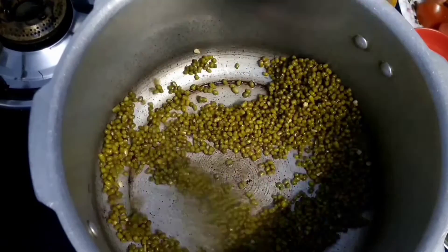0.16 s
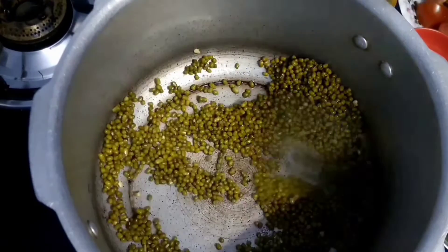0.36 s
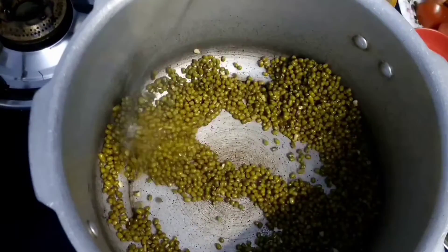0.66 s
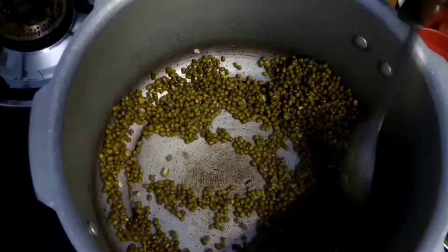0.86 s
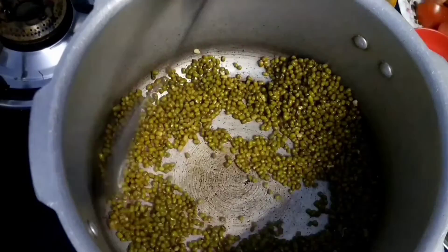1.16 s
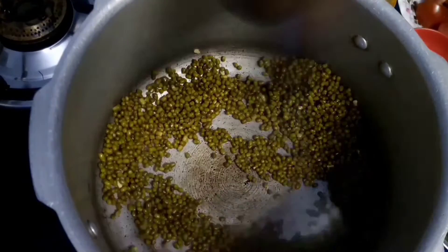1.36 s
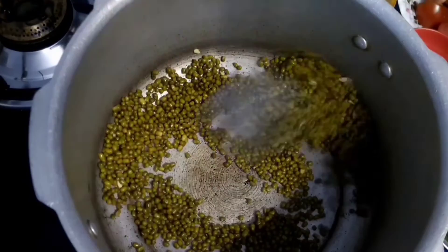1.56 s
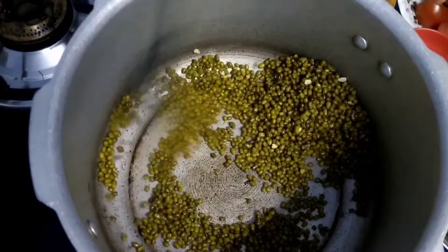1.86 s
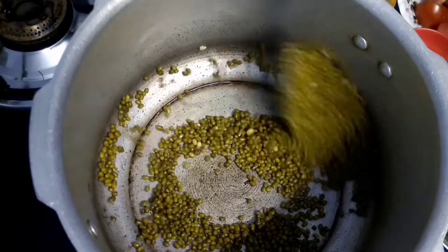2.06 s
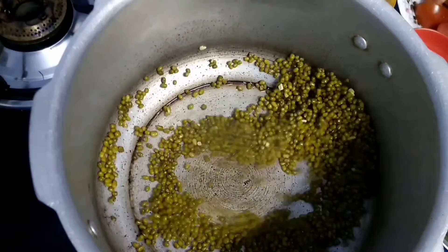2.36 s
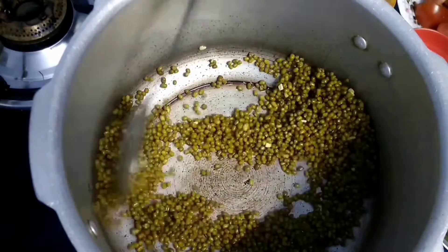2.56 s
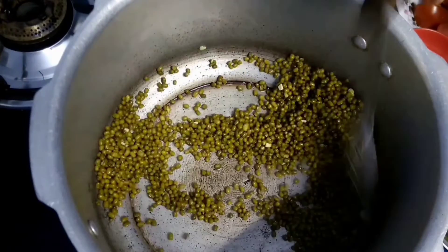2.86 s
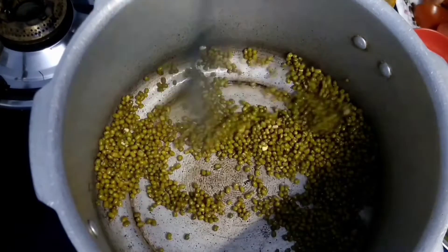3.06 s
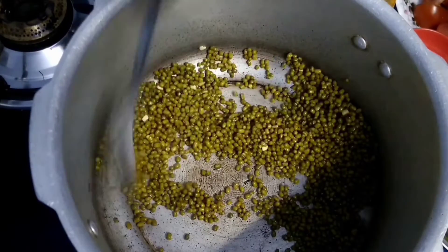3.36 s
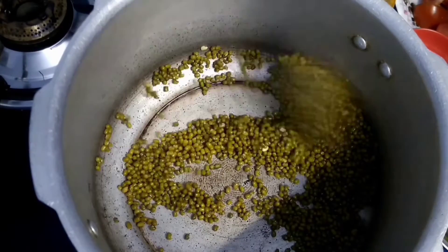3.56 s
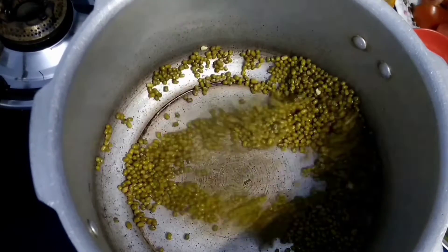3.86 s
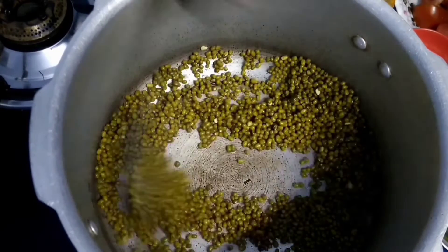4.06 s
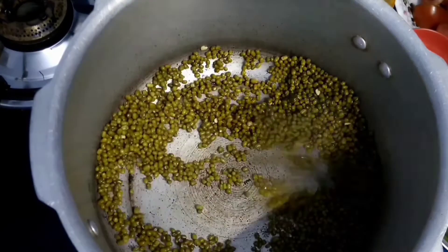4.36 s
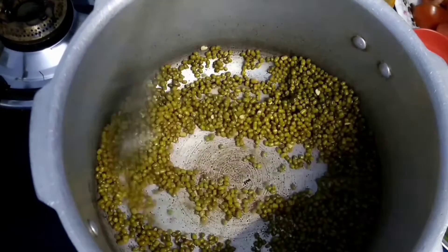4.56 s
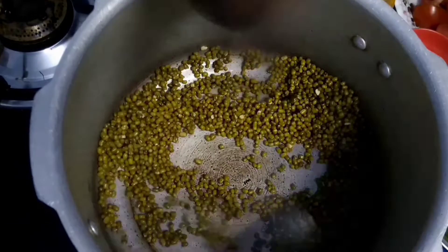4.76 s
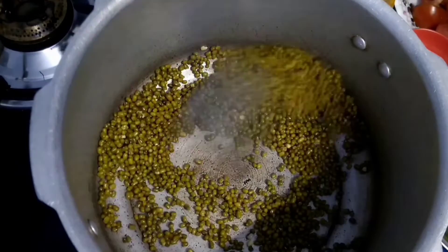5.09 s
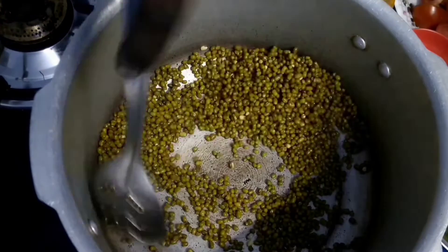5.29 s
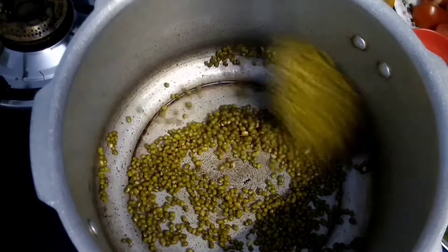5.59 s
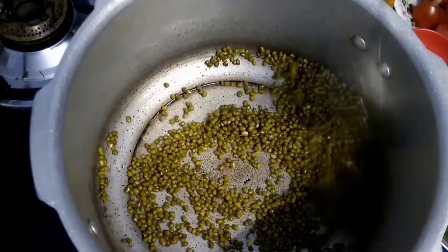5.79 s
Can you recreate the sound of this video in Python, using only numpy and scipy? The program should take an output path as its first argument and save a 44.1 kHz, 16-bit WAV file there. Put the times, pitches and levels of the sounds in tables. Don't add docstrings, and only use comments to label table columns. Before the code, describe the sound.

Thousands of small hard beans roll and tick over bare metal in uneven waves, several per second, pushed by a steel blade. Dull short thuds and rough drags on the pot base lead each wave, with thin squeals from jammed beans. Now and then the pot wall rings, then is damped. The last second is loudest. Close mono microphone, dry quiet kitchen, soft hiss beneath.

```python
import sys
import numpy as np
from scipy import signal
from scipy.fft import rfft, irfft
from scipy.io import wavfile
from scipy.ndimage import uniform_filter1d

SR = 44100
rng = np.random.default_rng(int(sys.argv[2]) if len(sys.argv) > 2 else 0)


def invert_db(x):
    u = np.asarray(x, float) / 20
    return 10 ** u


def wav_record(signal):
    frames = np.transpose(np.atleast_2d(signal))
    bounded = np.clip(frames, -1, 1)
    quanta = np.round(bounded * 32767).astype(np.int16)
    wavfile.write(sys.argv[1], SR, quanta)


N = 261513

# fullest_s, patter_db, build_s, settle_s
HEAPS = [(.04, -17, 0.2, 0.19), (0.231, -19, 0.074, 0.056), (.38, -19, 0.22, 0.15), (.62, -21, 0.091, 0.26),
         (.9, -22, 0.13, 0.22), (1.209, -23, 0.072, 0.27), (1.312, -18, 0.1, 0.34), (1.675, -24.5, .006, 1),
         (1.852, -19.5, 0.11, 0.19), (1.95, -34, 0.082, 0.45), (2.2, -24.5, 0.097, 0.55),
         (2.36, -21.5, 0.23, 0.076), (2.61, -18.5, 0.076, 0.29), (2.73, -22.5, 0.081, 0.51),
         (2.98, -27, 0.14, 0.25), (3.185, -11.5, 0.005, 0.049), (3.339, -20.5, 0.16, 0.2),
         (3.555, -33, 0.045, 0.15), (3.82, -21, 0.57, 0.2), (4.052, -18, 0.064, 0.17),
         (4.19, -20.5, 0.032, 0.22), (4.4, -23, 0.18, 0.16), (4.6, -25, 0.14, 1), (4.822, -17, 0.088, 0.25),
         (5.081, -28.5, 0.08, 0.035), (5.2, -9.5, 0.0066, 0.019), (5.331, -14, 0.083, 0.22),
         (5.64, -26.5, 0.22, 0.065), (5.713, -1.5, 0.0073, 0.03), (5.9, -21, 0.37, 0.15)]
HEAP_RANGE_DB, BUILD_CURVE, SETTLE_CURVE = 21.5, 2.4, 1.53
# start_s, peak_db, blade_ring_db
BEAN_DROPS = [(0.024, -1, -25), (0.196, -7, 11), (0.527, -19, 7.5), (0.775, -14, 1), (0.9867, -6.5, 3.5),
              (1.1373, -18.5, -5), (1.265, -20, -1.5), (1.424, -4.5, -20.5), (1.6682, 6.5, -16),
              (1.7372, -3, -14), (1.848, -11.5, -35.5), (1.9085, -11, 8.5), (2.162, -4.5, -6),
              (2.374, -8, -6), (2.4375, -9.5, 9), (2.5316, 2, -20), (2.6454, -3, 2), (2.7036, -0.5, -13),
              (3.1482, -19, -19), (3.1786, 11, -3), (3.333, -5, 0.1), (3.5254, -7, -1), (3.598, -2.5, -20),
              (3.9103, -15, 0.5), (3.9846, 0, -6), (4.538, -10, -7), (4.685, -14, 14), (4.753, -1.5, -20),
              (5.286, -18, 5), (5.7132, -23.5, 8), (0.307, -10, -12), (0.383, -2.5, -10), (0.447, -10, -5),
              (0.5796, -20, -10), (0.834, -10, -12), (1.2057, -30, -8), (1.241, -21, -10),
              (2.1329, -28, -22), (2.237, -12, -10), (2.394, -3, -10), (2.518, -4.5, -18), (2.591, -8, -10),
              (2.7234, -1, -13), (3.304, -11, -12), (3.555, -7, -12), (3.722, -4, -8), (3.778, -5, -10),
              (3.8172, -10, -12), (3.849, -4.5, -10), (3.929, -9.5, -1.5), (4.0253, -5, 0),
              (4.048, -6.5, 9), (4.188, -6.5, -1), (4.335, -19, -10), (4.3535, -9.5, -4),
              (4.3795, -7.5, -2), (4.605, -9, -3), (4.667, -10, -11), (4.787, -5, -12), (5.3263, -9, -10)]
# pitch_hz, level_db, fade_60db_s
BLADE_MODES = [(6775, -3, .1), (7600, -3, .12), (7790, -5, .08), (8330, -5, .08), (9150, -5, .07),
               (9850, -2, .11), (10600, -5, .08), (11400, -2, .08), (11700, -5, .07), (12410, -2, .09),
               (13610, -2, .09), (14050, -5, .07)]
# pitch_hz, level_db (per Hz)
PATTER_TONE = [(1400, -91), (2500, -18), (4000, -22.5), (5300, -19.5), (6300, -9.5), (7300, -8),
               (10000, -9), (13900, -7), (15600, -14), (16400, -42)]

# start_s, peak_db, blade_edge_db
KNOCKS = [(0.026, 0.5, -27), (0.279, -7, -38), (0.302, -7.5, -23), (0.604, -10, -33), (0.85, -9.5, -20),
          (1.248, -14.5, -45), (1.281, 3, -25), (1.377, -2, -17), (1.669, 0, -14), (1.738, -3.5, -13),
          (2.197, -4, -9), (2.316, -22, -22), (2.487, -23, -46), (2.531, -2, -21), (2.746, -39, -7.5),
          (2.796, -41, -8), (3.212, -5, -45.5), (3.354, 0.5, -24), (3.637, -10, -49), (3.684, -13, -43),
          (3.985, -1.5, -13.5), (4.254, -13, -52), (4.606, -22, -30), (4.712, -5, -26), (4.747, -7, -21),
          (4.849, -1, -15), (5.205, 1, -6.5), (5.255, -18, -35), (3.936, -26, -50), (5.708, -22, -3),
          (0.329, -16, -13.5), (0.566, -32, -55), (0.858, -9.5, -18), (0.891, -10.5, -30),
          (1.169, -39, -55), (1.286, -7, -25), (1.299, -5, -32), (1.32, -11, -29), (1.341, -6, -18),
          (2.185, -15, -29), (2.504, -16.5, -49), (2.575, -10, -33), (2.723, -44, -27), (2.772, -29, -35),
          (2.81, -16, -28), (2.878, -27, -34), (3.754, -21.5, -27), (3.785, -23.5, -30), (4.046, -16, -21),
          (4.309, -9.5, -33), (4.349, -17.5, -27), (4.541, -44, -53), (4.638, -23, -26),
          (4.829, -13.5, -25), (5.199, -17, -21), (5.302, -18, -32), (5.374, -23, -28), (5.425, -19, -45),
          (4.759, -4, -16), (4.805, -18, -29)]
# lands_s, stays_down_s, drag_db, grit_db, wall_brush_db
STROKES = [(0.01, 0.065, -27, -21, -39.5), (0.275, 0.1, -31.5, -24.5, -45.5),
           (0.599, 0.055, -39, -22.5, -80), (0.845, 0.077, -26.5, -19.5, -55),
           (1.278, 0.065, -14, -35, -36.5), (1.38, 0.062, -28, -32, -39), (1.67, 0.11, -21.5, -29, -42),
           (1.81, 0.16, -27, -26, -36), (2.186, 0.055, -26, -25, -36.5), (2.28, 0.042, -35, -24, -50),
           (2.52, 0.094, -29, -23.5, -54), (2.751, 0.051, -49, -14.5, -55), (2.801, 0.12, -30, -31, -40.5),
           (3.184, 0.14, -28, -32, -40), (3.331, 0.087, -25.5, -25, -48), (3.625, 0.15, -34.5, -25, -52),
           (3.981, 0.086, -28.5, -21, -43), (4.255, 0.1, -32.5, -26, -54),
           (4.603, 0.075, -34.5, -44, -42.5), (4.745, 0.12, -15, -33, -48), (4.88, 0.082, -40, -53, -41),
           (5.201, 0.16, -25.5, -31.5, -38.5), (5.373, 0.086, -26.5, -37, -30),
           (5.714, 0.17, -25, -26.5, -28.5)]
DRAG_SLOPES, GRIT_SLOPES, BRUSH_SLOPES = (1994, 27.5, 359), (707, -83.5, 185), (578, 31, 108)
# pitch_hz, level_db, fade_60db_s
BASE_MODES = [(315.8, -12.5, 0.15), (509.5, -1, 0.052), (512.8, -3.5, 0.14), (569.6, -12, 0.087),
              (625, -13, 0.023), (702.5, -8, 0.16), (849, -16.5, 0.13), (1018, -13.5, 0.28),
              (1060, -38, 0.045), (1132, -4.5, 0.054), (1196, -3.5, 0.04), (1180, -3, 0.026),
              (1757, -16.5, 0.2), (2020, -33, 0.26), (2340, -22, 0.26), (2924, -32, 0.26),
              (3560, -38, 0.24)]
# pitch_hz, level_db (per Hz)
DRAG_TONE = [(15, -72), (25, -41), (201, -15.5), (282, -18), (525, -2.5), (902, -7.5), (1060, -6.5),
             (1780, -8.5), (2560, -40), (3000, -47), (3900, -50), (6600, -120)]
# pitch_hz, level_db (per Hz)
GRIT_TONE = [(120, -61), (710, -20), (1200, 0.5), (1590, -4.5), (1680, -2), (2080, 2.5), (2660, -3),
             (3180, -3.5), (3780, -5), (5500, -9.5), (7150, -63), (12100, -120)]
# loudest_s, length_s, pitch_hz, level_db
JAMS = [(.31, 0.061, 903, -32), (0.337, 0.028, 1184, -30), (.64, 0.078, 1280, -39.5),
        (0.668, 0.18, 2060, -47), (0.714, 0.053, 2090, -39.5), (0.869, .03, 1160, -35),
        (0.919, 0.11, 1200, -38), (.93, .1, 2400, -45), (1.752, .06, 1150, -42), (2.276, 0.054, 1990, -39),
        (2.6, 0.096, 2390, -37.5), (2.758, .04, 2000, -43), (2.755, 0.026, 1170, -34),
        (2.818, 0.027, 980, -31), (3.305, 0.099, 1110, -36), (3.728, 0.058, 2814, -29.5),
        (3.751, 0.073, 1340, -36), (3.779, .05, 2040, -33.5), (4.053, 0.056, 2130, -29.5),
        (4.35, .08, 2040, -40), (4.422, 0.15, 2120, -43.5), (4.559, 0.05, 1150, -47),
        (4.629, 0.076, 1210, -38), (4.641, .05, 2330, -44), (4.766, 0.026, 1770, -33),
        (4.894, 0.12, 4600, -40), (5.29, .06, 2300, -41), (5.372, .12, 5000, -31),
        (5.391, 0.13, 4270, -34.5), (5.77, 0.072, 4300, -24), (5.845, 0.049, 2490, -29),
        (0.335, .06, 4200, -39), (1.288, 0.049, 2350, -42), (2.539, 0.034, 5200, -31),
        (3.701, 0.15, 4600, -40), (1.3, .07, 1760, -28.5), (1.31, .08, 1110, -29),
        (1.397, .06, 2070, -30.5), (5.43, 0.063, 564, -33), (5.44, 0.087, 1125, -33),
        (3.41, 0.073, 518, -30.5), (1.79, 0.077, 521, -31), (2.57, 0.077, 520, -31.5),
        (4.001, 0.042, 805, -34.5), (4.28, 0.054, 525, -33.5), (5.718, 0.029, 6550, -26),
        (3.193, 0.02, 5760, -18.5), (1.86, .05, 6660, -29), (5.798, .05, 955, -32), (4.8, 0.094, 1096, -28)]

# start_s, level_db, lowest_mode_db, second_mode_db, treble_db
CLANKS = [(0.203, -51.5, -20, -14, 5), (1.281, -52, 28, 23, -24), (1.343, -43, 4, -3, -5),
          (1.838, -33, -18.5, 13, -8.5), (1.897, -32, -27, -8, -15), (1.929, -35.5, -10, 12.5, -5.5),
          (2.744, -37, -25, -23, -7), (2.795, -31.5, 3, -1, -19.5), (3.182, -27.5, -24, -0.5, -0.5),
          (3.533, -53.5, -22, -22, 11.5), (4.2, -54, -24, 1, 0), (4.852, -46.5, 18, 21.5, -10),
          (5.209, -30, -14, -9, -28), (5.389, -43, 5, -14, -1.5), (5.43, -33.5, 10.5, -22, -10.5),
          (5.711, -23, 1, -11, -1), (5.788, -33.5, 11.5, 4, -10), (5.835, -45, 18, 1, -2)]
WALL_HZ = [769, 1028, 1575, 1598, 2137, 2153, 2520, 2546, 2929, 3452, 4078, 4301, 4549, 4780, 4832, 5071,
           5560, 5690, 6030, 6140, 6589, 6770, 6880, 7260, 7598, 7850, 8470, 8726, 324]
# level_db, fade_60db_s
WALL_MODES = [(-3.5, 0.73), (0, 0.84), (-0.5, 0.69), (-1.5, 0.69), (5, 0.5), (0, 0.57), (-5, 0.38),
              (0.5, 0.76), (6, 0.51), (2, 0.4), (-5.5, 0.33), (9, 0.3), (6.5, 0.1), (2, 0.28), (4, 0.24),
              (7, 0.1), (4, 0.19), (9, 0.085), (14, 0.17), (8, 0.14), (12, 0.19), (-12, 0.2), (-15, 0.12),
              (-11, 0.14), (12, 0.18), (9, 0.27), (-8, 0.13), (-10, 0.1), (-17, 0.51)]
PAIR_LEAN_DB = [9, 0.1, -7, 0, 6, -10, -6, 17, 15, 5, 8, -7, 12, 27, 20, -5, -3, 3]
PAIR_2150_DB = [0.46, 0.1, 0.1, 1.7, 2, 1.5, 0.1, 0.57, -1.2, 2, 0.1, 0.1, 0.39, -1.6, -2, 1.8, 0.1, 0.1]
TRIO_2500_DB = [1, 0.1, 0.1, -0.5, -1, -0.5, 0.1, 2, 0.8, -1, 0.1, -2, -4, -3, 0, -1.5, 1, 0.1]
LONE_3450_DB = [1, 0.1, -1, -3, 3, 6.5, -4, 0.1, -2.5, -10, -2, 0.1, 1, -1, -3, -4, 1, 2]
# pitch_hz, share (no unit)
HARDNESS = [(1100, -0.048), (1600, -0.16), (2140, 0.26), (3450, 0.85), (4300, 0.7)]
GRIPS_S = [.28, 1.44, 2.2, 2.755, 2.816, 3.42, 3.66, 4.28, 4.93, 5.66, 5.785, 5.95]

# pitch_hz, level_db
ECHO_NULLS = [(1600, -0.5), (1850, -3.5), (2050, -0.5), (3500, 0.5), (3780, -4), (4050, -0.5)]
# pitch_hz, level_db (per Hz)
KITCHEN_TONE = [(20, -27), (60, -1.5), (130, -14), (190, 9), (260, -1), (500, 3.5), (1000, -6), (2200, -20),
                (5000, -25)]


def beans(patter_db):
    s, db, blade_db = np.transpose(BEAN_DROPS)
    taps = grains(2400, 2.13, count=6) * invert_db(patter_db - 1.5 + 1.9 * walk(25) + 0.42 * walk(90))
    taps = taps * invert_db([2.9 * walk(13) + 1.88 * walk(45) for _ in taps])
    taps = taps + bursts(s, db + 18, 0.003, count=6)
    hz = 3700 + 12300 * (np.arange(330) + rng.random(330)) / 330
    t60 = 0.031 * invert_db(rng.standard_normal(330))
    ring = struck(taps, hz, 0 * hz, t60, 6.98, count=4096)
    stray = grains(160, 1.8, count=7) * invert_db(patter_db + 3.5)
    stray = stray + bursts(s, db + blade_db + 31, 0.0013, count=7)
    blade = struck(stray, *np.transpose(BLADE_MODES), 4, count=4096) * invert_db(-49)
    rattle = ring * invert_db(-52) + smear(taps.sum(axis=0), 0.003) * invert_db(-13)
    return colour(rattle + blade, PATTER_TONE) * invert_db(3.5)


def spatula(drag_db, grit_db):
    s, db, edge_db = np.transpose(KNOCKS)
    hz, mode_db, t60 = np.transpose(BASE_MODES)
    slips = grains(500, 2.4, count=4) * invert_db(drag_db - 36 + 1.03 * walk(30))
    knocks = np.abs(bursts(s, db - 19, 0.00008, count=6))
    body = struck(np.r_[slips, knocks * invert_db(-8)], hz, mode_db, t60, 1, count=8192)
    body = body + struck(knocks, hz, mode_db, 0.35 * t60, 1.5, count=4096)
    body = signal.sosfilt(signal.butter(3, 380, "high", fs=SR, output="sos"), body)
    shake = unit(colour(rng.standard_normal(N), DRAG_TONE)) * invert_db(drag_db - 8 + 2 * walk(8.2))
    edge = colour(bursts(s, edge_db + 20, 0.002, count=1)[0], GRIT_TONE)
    return body + shake + grinding(grit_db) + edge


def grinding(grit_db):
    rolls = grains(1800, 2.8, count=4) * invert_db([5.1 * walk(14) for _ in range(4)])
    patch_hz = 900 + 5000 * (np.arange(48) + rng.random(48)) / 48
    ring = struck(rolls, patch_hz, 0 * patch_hz, np.full(48, 0.053), 4, count=2048)
    rasp = unit(smear(rolls.sum(axis=0), 0.0038)) + invert_db(1) * unit(ring)
    return even(colour(rasp, GRIT_TONE), 0.15) * invert_db(grit_db - 18 + 2 * walk(35))


def jams():
    slips_per_s, fade_cycles, spread = 700, 90, 0.023
    out, t = np.zeros(N + 16384), np.arange(-4096, 4096) / SR
    for s, span, hz, db in JAMS:
        slips = (rng.random(8192) < slips_per_s / SR) * invert_db(4.6 * rng.standard_normal(8192))
        patch_hz = hz * (1 + spread * np.array([-1, 0, 1]) + 0.012 * rng.standard_normal(3))
        ring = rings(patch_hz, fade_cycles / patch_hz, count=2048).sum(axis=0)
        sing = even(signal.oaconvolve(slips, ring)[:8192], 0.013)
        start = int(s * SR)
        out[start:start + 8192] += invert_db(db) * sing * np.exp(-2 * (2 * t / span) ** 2)
    return out[4096:4096 + N]


def wall(brush_db):
    hz, (db, t60) = np.array(WALL_HZ), np.transpose(WALL_MODES)
    brush_taps = grains(300, 2.5, count=3) * invert_db(brush_db - 33)
    brush = struck(brush_taps, hz, db - 8 * np.log2(hz / 1000), 0.3 * t60, 2.5, count=8192)
    out = wall_blows(hz, db, t60) + brush + wall_clang()
    return signal.sosfilt(signal.butter(2, 420, "high", fs=SR, output="sos"), out)


def wall_blows(hz, db, t60):
    out, t = np.zeros(N + 20480), np.arange(20480) / SR
    phase = 2 * np.pi * rng.random((len(hz), 1))
    flutter = invert_db([3.5 * min(f / 4800, 1) ** 2 * np.resize(walk(70), len(out)) for f in hz])
    fade = np.exp(-np.log(1000) * np.outer(1 / t60, t))
    hard_share = np.interp(hz, *np.transpose(HARDNESS))
    blows = zip(CLANKS, PAIR_LEAN_DB, PAIR_2150_DB, TRIO_2500_DB, LONE_3450_DB)
    for (s, blow_db, first_db, second_db, treble_db), lean_db, pair_db, trio_db, lone_db in blows:
        start = int(s * SR)
        free_s = min([grip_s - s for grip_s in GRIPS_S if grip_s > s] + [1])
        favour_db = np.r_[first_db, second_db, -lean_db, 0.25 * lean_db, pair_db, pair_db,
                          trio_db, trio_db, trio_db, lone_db, 0 * hz[10:]]
        spot_db = db + treble_db * hard_share + favour_db
        gain = invert_db(blow_db + spot_db + 0.35 * rng.standard_normal(len(hz)))
        grip = np.outer(np.minimum(hz / 1700, 1.3) ** 1.3, np.maximum(t - free_s, 0) / 0.04)
        swing = np.sin(2 * np.pi * np.outer(hz, t + start / SR) + phase) * fade * np.exp(-grip)
        onset = 1 - np.exp(-t / 0.0005)
        out[start:start + len(t)] += gain @ (swing * flutter[:, start:start + len(t)]) * onset
    return out[:N]


def wall_clang():
    s, blow_db, _, _, treble_db = np.transpose(CLANKS)
    hz = 4100 + 5200 * (np.arange(200) + rng.random(200)) / 200
    t60 = 0.25 * invert_db(1.75 * rng.standard_normal(200))
    hits = bursts(s, blow_db + treble_db - 7.5, 0.0075, count=3)
    return struck(hits, hz, -3 * np.log2(hz / 5000), t60, 3.4, count=8192)


def kitchen():
    return unit(colour(rng.standard_normal(N), KITCHEN_TONE)) * invert_db(-63.5 + walk(17))


def heap_db():
    fullest, db, build, settle = np.transpose(HEAPS)[:, :, None]
    since = np.arange(0, N, 64) / SR - fullest
    building = (np.maximum(-since, 0) / build) ** BUILD_CURVE
    settling = (np.maximum(since, 0) / settle) ** SETTLE_CURVE
    return np.repeat(pile(db - HEAP_RANGE_DB * (building + settling)), 64)[:N]


def stroke_db(level_db, slopes):
    lands, down = np.transpose(STROKES)[:2, :, None]
    since = np.arange(0, N, 64) / SR - lands
    fall = slopes[0] * np.maximum(-since, 0)
    fall = fall + slopes[1] * np.clip(since, 0, down)
    fall = fall + slopes[2] * np.maximum(since - down, 0)
    return np.repeat(pile(level_db[:, None] - fall), 64)[:N]


def pile(db):
    return 10 * np.log10(np.sum(invert_db(np.maximum(db, -120)) ** 2, axis=0))


def grains(rate, scatter_db, count):
    falls = rng.random((count, N)) < rate / count / SR
    hardness = np.minimum(rng.exponential(size=(count, N)), 3.2)
    return unit(falls * invert_db(scatter_db * hardness))


def bursts(times, db, length_s, count):
    out, t = np.zeros((count, N + 4096)), np.arange(4096) / SR
    for k, (s, gain, span) in enumerate(np.broadcast(times, invert_db(db), length_s)):
        bounce = rng.standard_normal(4096) * np.exp(-t / max(span, 1e-4))
        start = int(s * SR)
        out[k % count, start:start + 4096] += gain * bounce / np.linalg.norm(bounce)
    return out[:, :N]


def struck(taps, hz, db, t60, spread_db, count):
    spots = rng.standard_normal((2, len(taps), len(hz)))
    gains = invert_db(db + spread_db * spots[0]) * np.sign(spots[1])
    shapes = gains @ rings(hz, t60, count)
    return sum(signal.oaconvolve(row, shape)[:N] for row, shape in zip(taps, shapes))


def rings(hz, t60, count):
    t = np.arange(count) / SR
    return np.sin(2 * np.pi * np.outer(hz, t)) * np.exp(-np.log(1000) * np.outer(1 / t60, t))


def smear(x, length_s):
    tail = rng.standard_normal(2048) * np.exp(-np.arange(2048) / SR / length_s)
    return signal.oaconvolve(x, tail / np.linalg.norm(tail))[:N]


def colour(x, points):
    hz, db = np.transpose(points)
    grid = np.maximum(np.arange(2049) * SR / 4096, 1)
    cepstrum = irfft(np.interp(np.log(grid), np.log(hz), db) * np.log(10) / 20)
    cepstrum[1:2048] *= 2
    cepstrum[2049:] = 0
    return signal.oaconvolve(x, irfft(np.exp(rfft(cepstrum))))[:N]


def walk(rate):
    k = int(SR / rate)
    return uniform_filter1d(np.repeat(rng.standard_normal(N // k + 1), k), k)[:N]


def even(x, span_s):
    power = uniform_filter1d(x ** 2, int(span_s * SR))
    return unit(x / (power + 0.01 * np.mean(x ** 2)) ** 0.4)


def unit(x):
    return x / np.sqrt(np.mean(x ** 2))


def scene():
    drag, grit, brush = np.transpose(STROKES)[2:]
    patter_db = heap_db()
    drag_db = pile([stroke_db(drag, DRAG_SLOPES), patter_db - 35])
    rolling_grit_db = patter_db - 12 + 0.31 * (patter_db + 28)
    grit_db = pile([stroke_db(grit, GRIT_SLOPES), rolling_grit_db])
    pot = beans(patter_db) + spatula(drag_db, grit_db) + wall(stroke_db(brush, BRUSH_SLOPES))
    mono = colour(pot + kitchen(), ECHO_NULLS) + jams()
    return np.array([mono, mono])


def top_cut(x):
    return signal.sosfilt(signal.butter(12, 16500, fs=SR, output="sos"), x)


def record(dry):
    x = signal.sosfilt(signal.ellip(8, 0.2, 45, 15550, fs=SR, output="sos"), dry)
    mix = np.tanh(1.1 * x) / 1.1
    return top_cut(mix)


dry = scene()
out = record(dry)
wav_record(out)
```